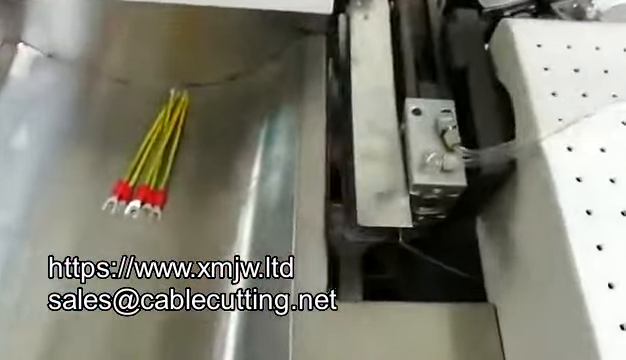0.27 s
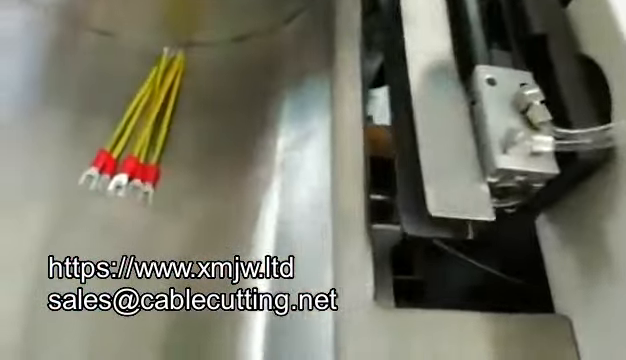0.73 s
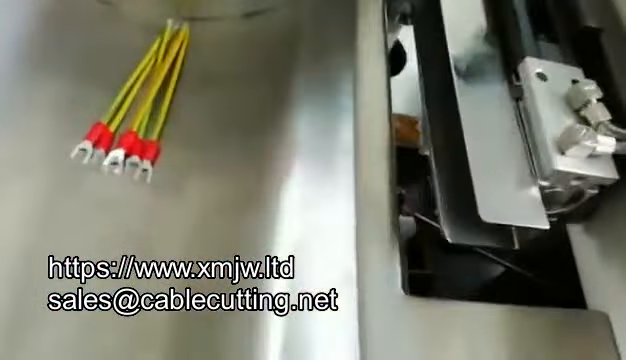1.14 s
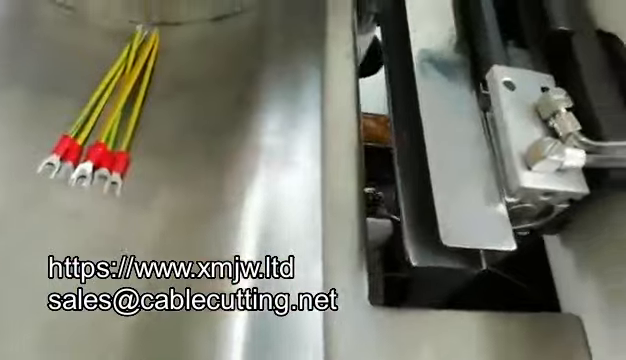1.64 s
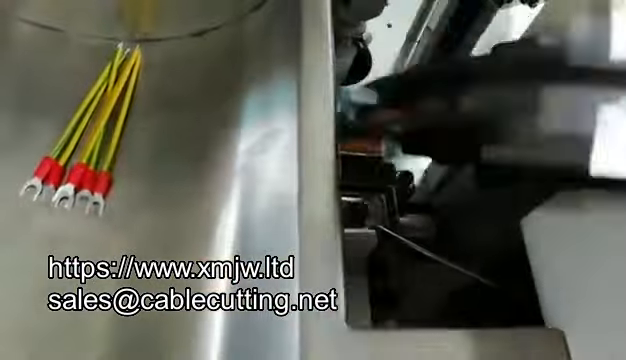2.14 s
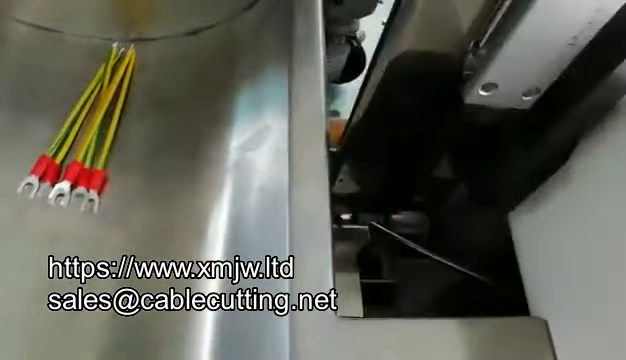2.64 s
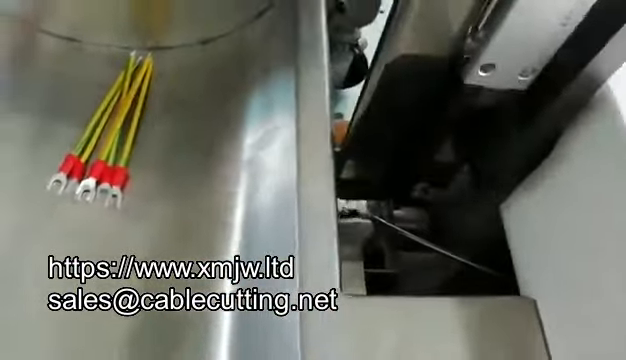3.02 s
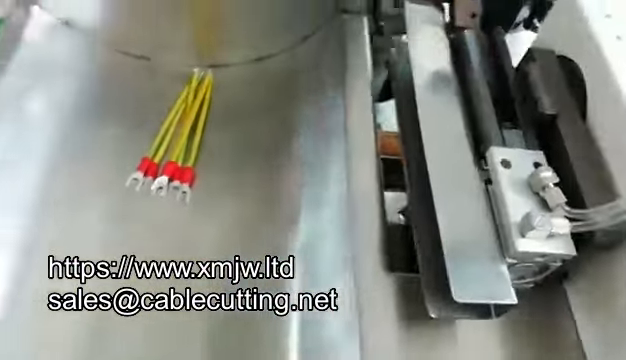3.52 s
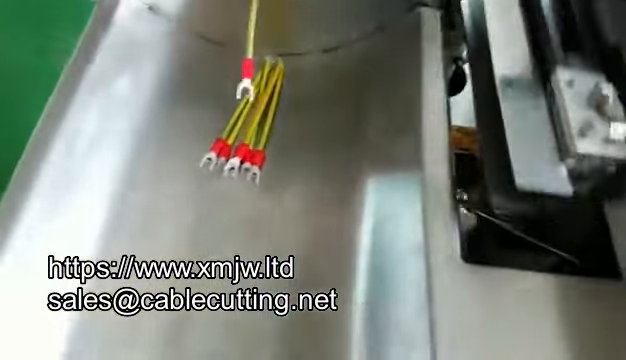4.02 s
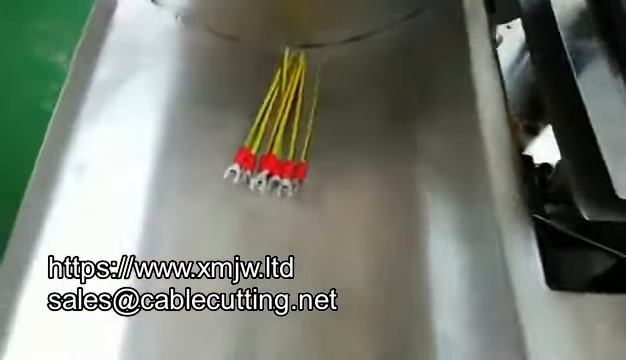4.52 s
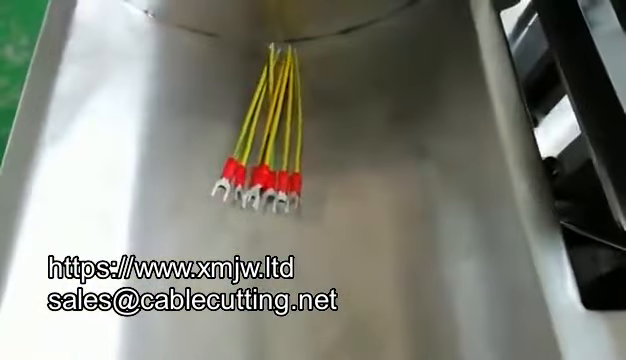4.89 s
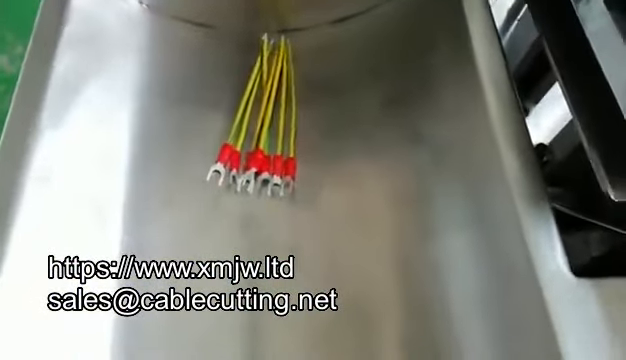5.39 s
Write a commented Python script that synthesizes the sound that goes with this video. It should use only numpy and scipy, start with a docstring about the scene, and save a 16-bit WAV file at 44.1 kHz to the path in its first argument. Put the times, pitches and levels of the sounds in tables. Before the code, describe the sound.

An automatic wire crimping machine works close by, over the faint murmur and hum of a workshop. From the start, geared servos whine up and down and a fine air jet hisses softly. From about 0.5 seconds slides rattle the steel frame, the base booms, valves puff and cylinders thump, followed by sharp knocks from the press and grippers. At 1.2 seconds an air nozzle roars for about half a second. Around 2 seconds a swing arm sings a thin high tone amid more clatter. From 3.1 seconds come quick knocks and a hard hiss of air, which spurts twice near 3.8 seconds as the finished wire crosses the jet. Its small metal terminal ticks brightly on the guide and tray at about 4.2 seconds. At 4.5 seconds the cycle restarts with more whines, rattles and puffs. The panels and room add a short echo.

```python
"""An automatic wire crimping machine, close by, over the murmur of a workshop. From the start geared servos
whine up and down, slides rattle the steel frame and a fine air jet hisses. From 0.5 s the bed booms, valves
puff and cylinders thump; then press, grippers, end stops and gears taking up backlash knock. A blow-off nozzle
roars at 1.2 s, a swing arm sings at 2 s and the jet blows hard from 3.1 s. The finished lead crosses it at 3.8
s, then its terminal ticks on guide and tray. At 4.5 s the cycle restarts. Panels and room echo."""
import sys
import numpy as np
from scipy import signal
from scipy.fft import rfft, irfft, next_fast_len
from scipy.io import wavfile
from scipy.ndimage import uniform_filter1d, map_coordinates

SR = 44100
rng = np.random.default_rng(int(sys.argv[2]) if len(sys.argv) > 2 else 0)


def inscribe(sig):
    """Save sig as 16-bit PCM at rate SR to the path in sys.argv[1].

    A 1-D sig is mono; a 2-D sig holds one channel per row.
    Samples are clipped to [-1, 1] before scaling.
    """
    pcm = np.round(np.clip(np.atleast_2d(sig).T, -1, 1) * 32767)
    wavfile.write(sys.argv[1], SR, pcm.astype(np.int16))


N = 249606
CYCLE_S, BAND_HZ = 4.548, 7530


def amp(db):
    """Decibels to gain."""
    return 10 ** (np.asarray(db) / 20)


def unit(x):
    """Scale to rms 1."""
    return x / np.sqrt(np.mean(x ** 2) + 1e-20)


def along(points, hz):
    """Interpolate (frequency [Hz], value) points on a log axis."""
    f, v = np.transpose(points)
    return np.interp(np.log(hz + 1), np.log(f + 1), v)


def clock():
    """Sample times in s."""
    return np.arange(N) / SR


def since(s):
    """Time since the cycle last passed moment s."""
    return (clock() - s) % CYCLE_S


def held(start, end, attack_s, release_db_per_s):
    """Envelope that rises, holds and dies away, once a cycle."""
    age = since(start)
    return (1 - np.exp(-age / attack_s)) * amp(-release_db_per_s * np.maximum(age - (end - start), 0))


def pulse(s, t60_s, attack_s):
    """Strike envelope, once a cycle."""
    return (1 - np.exp(-since(s) / attack_s)) * amp(-60 * since(s) / t60_s)


def burst(s, t60_s, attack_s):
    """Strike envelope, once only."""
    age = np.maximum(clock() - s, 0)
    return (1 - np.exp(-age / attack_s)) * amp(-60 * age / t60_s)


def wobble(rate_hz):
    """Smooth random curve, rate_hz knots a second."""
    return map_coordinates(rng.standard_normal(int(N * rate_hz / SR) + 4), [clock() * rate_hz])


def filtered(x, response):
    """Apply a frequency response."""
    size = next_fast_len(N + SR // 2)
    return irfft(rfft(x, size) * response(np.fft.rfftfreq(size, 1 / SR)), size)[..., :N]


def resonances(modes):
    """Causal response of (frequency [Hz], width [Hz], gain [dB]) modes, alternating in sign."""
    return lambda f: sum((-1) ** k * amp(db) * 1j * f * width / (hz * hz - f * f + 1j * f * width)
                         for k, (hz, width, db) in enumerate(modes))


def noise(spectrum):
    """Noise of rms 1, coloured by (frequency [Hz], density [dB]) points."""
    return unit(filtered(rng.standard_normal(N), lambda f: amp(along(spectrum, f))))


def resonant_noise(modes):
    """Noise of rms 1, rung through modes."""
    return unit(filtered(rng.standard_normal(N), resonances(modes)))


# diffuse sound: (frequency [Hz], left-right correlation [-1..1])
COHERENCE = [(300, 1), (500, -0.17), (7000, 0.06)]

def spread(pair):
    """Mix two unrelated signals to left and right, alike in the bass."""
    turn = lambda f: np.arccos(np.clip(along(COHERENCE, f), -1, 1)) / 2
    mid, side = filtered(pair, lambda f: np.array([np.cos(turn(f)), np.sin(turn(f))]))
    return np.array([mid + side, mid - side])


# echo decay: (frequency [Hz], t60 [s])
ROOM_DECAY = [(200, 0.12), (1500, 0.26), (7000, 0.058)]

def placed(x, wet_db, left_db):
    """Direct sound plus echo off panels and walls, panned."""
    hz, t, spectra = signal.stft(rng.standard_normal((2, SR // 3)), SR, nperseg=256)
    tail = signal.istft(spectra * amp(-60 * t / along(ROOM_DECAY, hz)[:, None]), SR, nperseg=256)[1]
    echo = spread(signal.fftconvolve(x[None], tail / np.linalg.norm(tail[0]), axes=1)[:, :N])
    return (x + amp(wet_db) * echo) / np.hypot(1, amp(wet_db)) * amp([[left_db / 2], [-left_db / 2]])


def from_right(pair, lag_s=0.00014):
    """Sound from the right arrives later on the left."""
    return filtered(pair, lambda f: np.exp(-2j * np.pi * f * np.array([[lag_s], [0]])))


def shaded(pair, shadow_db):
    """Treble from the right is shadowed on the left."""
    sides = np.array([[-.5], [.5]])
    return filtered(pair, lambda f: amp(shadow_db * np.minimum(f / BAND_HZ, 1) ** 2 * sides))


def turbulence(response, patchy_db, left_db):
    """Diffuse rush of air whose colour flutters in small patches."""
    spectra = signal.stft(rng.standard_normal((2, N)), nperseg=256)[2]
    patches = uniform_filter1d(rng.standard_normal(spectra.shape[1:]), size=3, axis=0)
    patches = uniform_filter1d(patches, size=5, axis=1)
    pair = signal.istft(spectra * amp(patchy_db * unit(patches)), nperseg=256)[1][:, :N]
    return unit(spread(filtered(pair, response))) * amp([[left_db / 2], [-left_db / 2]])


# shop murmur: (frequency [Hz], relative density [dB])
SHOP_SPECTRUM = [(25, -10), (165, -4.5), (234, -4.5), (351, -6), (637, -18), (1050, -28), (1540, -13),
                 (1730, -19), (2420, -19.5), (4940, -24), (7400, -52)]
# shop hum: (frequency [Hz], level [dB])
HUM_TONES = [(176, -48), (349, -54)]

def workshop(floor_db=-43):
    """Other machines murmur and hum all round."""
    hum = sum(amp(db + 3 * wobble(6)) * np.sin(2 * np.pi * hz * clock() + 1.2 * wobble(14))
              for hz, db in HUM_TONES)
    murmur = unit(spread(np.array([noise(SHOP_SPECTRUM), noise(SHOP_SPECTRUM)])))
    return amp(floor_db) * murmur + hum


# servo moves: (start [s], end [s], top mesh pitch [Hz], each ramp [share of move],
# fundamental [dB], octave [dB], frame shake [dB], grinding [dB])
SERVO_MOVES = [(0, .39, 519.2, .06, -49.5, -68, -60, -60), (0.082, 0.306, 1375, .46, -32.5, -34, -52, -49),
               (0.312, .578, 1548, .5, -48, -44, -29, -54), (0.645, 0.871, 1848, .4, -40, -25.5, -26, -30),
               (0.882, 0.984, 1710, .5, -29, -50, -25, -56), (0.984, 1.082, 1770, .5, -30, -52, -25, -44),
               (1.088, 1.215, 1036, 0.5, -32, -52, -27, -56), (1.97, 2.362, 2470, .2, -42, -62, -24, -48),
               (2.372, 2.455, 1280, 0.5, -27, -58, -30, -54), (2.455, 2.57, 1500, 0.5, -34, -62, -33, -46),
               (2.752, 2.85, 1660, 0.49, -24, -58, -26, -46),
               (2.95, 3.085, 1073, 0.37, -37.5, -44, -35, -55),
               (2.987, 3.211, 1555, .5, -48, -43, -28, -36), (3.07, 3.192, 2384, 0.5, -26, -50, -21, -37),
               (4.03, 4.285, 1240, .38, -32, -56, -29, -50), (4.247, 4.37, 1061, .3, -42, -39.5, -38, -66),
               (4.356, 4.444, 1697, .4, -35, -55, -28, -40), (4.373, 4.614, 1571, .5, -29, -38, -29, -32.5)]
# loaded pinion: (order [cycles/turn], relative level [dB])
PINION_TONES = [(4, 0), (5, -6), (8, -7), (11, -7)]
# covers: (frequency [Hz], width [Hz], gain [dB])
COVER_MODES = [(900, 114, 3), (1213, 250, -4.5), (1600, 120, -3.5)]

def servos(teeth=6, runout=0.095, cruise_torque=.35, sing_db=5, bearing_db=-4):
    """Gear whine glides with speed, bearings grind, covers sing as the pitch sweeps their modes."""
    whine, drive, grind = np.zeros((3, N))
    flutter, roughness = 1 + .015 * wobble(500), amp(3.5 * wobble(220))
    first_flicker_db, octave_flicker_db = 3 * wobble(55), 3 * wobble(55)
    for start, end, top_hz, ramp, first_db, octave_db, shake_db, grind_db in SERVO_MOVES:
        speed = axis_speed(start, end, ramp)
        on = speed > 0
        speed = speed[on]
        phase = 2 * np.pi * np.cumsum(top_hz * speed * flutter[on]) / SR
        pressure = 1 + runout * np.sin(phase / teeth)  # teeth bear harder once a turn
        overtones = np.sin(2 * phase) + amp(-19) * np.sin(4 * phase) + amp(-22) * np.sin(5 * phase)
        mesh = amp(first_db + first_flicker_db[on]) * np.sin(phase)
        mesh += amp(octave_db + octave_flicker_db[on]) * pressure * overtones
        pinion = sum(amp(db) * np.sin(order * phase / teeth) for order, db in PINION_TONES)
        crest = .33 * speed ** 2 + .67 * speed ** 14  # peaks at top speed
        whine[on] += crest * mesh + amp(grind_db) * speed ** 2 * pinion
        torque = np.sqrt(speed) * (cruise_torque + (1 - cruise_torque) * np.sqrt(1 - speed ** 2))
        drive[on] += amp(shake_db + sing_db) * torque * (np.sin(phase) + amp(-6) * np.sin(2 * phase))
        grind[on] += amp(grind_db + bearing_db) * pressure * speed ** 2
    covers = filtered(drive * roughness, resonances(COVER_MODES))
    grit = noise([(500, 5.5), (1300, 10), (2700, -4), (3600, -2), (4500, -7), (7000, 2)])
    bearings = grind * roughness * grit
    motors = placed(whine * roughness, wet_db=4.5, left_db=0)
    return motors + placed(covers + bearings, wet_db=5.5, left_db=4.5)


def axis_speed(start, end, ramp):
    """Speed 0-1: ramp up, cruise, ramp down."""
    edge = np.minimum(since(start), end - start - since(start)) / (end - start)
    return np.sin(np.pi / 2 * np.clip(edge / ramp, 0, 1))


def servo_shake(peak_hz=920, width_hz=199, off_peak=0.35, settle_s=0.047):
    """The frame shakes most as a mesh pitch passes its modes; loose parts then settle."""
    force = np.zeros(N)
    for start, end, top_hz, ramp, _, _, shake_db, _ in SERVO_MOVES:
        speed = axis_speed(start, end, ramp)
        on = speed > 0
        resonance = np.exp(-((top_hz * speed[on] - peak_hz) / width_hz) ** 2)
        force[on] += amp(shake_db) * (off_peak * speed[on] + resonance)
    pole = np.exp(-1 / (settle_s * SR))
    return signal.lfilter([1 - pole], [1, -pole], force)


# steel frame: (frequency [Hz], width [Hz], gain [dB])
FRAME_MODES = [(819.3, 10, 13.5), (913, 23, -0.5), (1041.3, 39, 1), (1177, 37, 5), (1275, 57, -6.5),
               (1525, 140, -9.5), (1654, 25, -4)]

def frame_ring(x, drift=.06):
    """Ring x through the frame, rms 1; the modes drift at random, as under moving carriages."""
    position = np.cumsum(1 + drift * wobble(22))
    return unit(np.interp(position % N, np.arange(N), filtered(x, resonances(FRAME_MODES))))


# carriage strokes: (start [s], end [s], rattle [dB], rumble [dB])
CARRIAGE_STROKES = [(0.57, 0.748, -31.5, -44), (0.718, 1.022, -33, -36.5), (1.1, 2.08, -30.5, -34.5),
                    (1.743, 2.477, -27, -34.5), (2.083, 2.346, -44, -30.5), (2.72, 2.926, -41.5, -42.5),
                    (3.108, 3.191, -32, -37), (3.213, 3.702, -38.5, -42), (3.687, 3.997, -29, -32.5),
                    (4.043, 4.177, -32.5, -31)]
# rolling balls and base rumble: (frequency [Hz], relative density [dB])
ROLL_SPECTRUM = [(400, -73), (750, 7), (1200, 5.5), (1700, 3.5), (2100, -2), (3000, -3), (7500, -9.5)]
RUMBLE_SPECTRUM = [(40, -30), (110, -19.5), (190, -1.5), (250, -8.5), (310, 4), (400, -5.5), (480, -1),
                   (620, -8), (1500, -21), (4000, -41)]

def carriages(rise_s=0.01, stop_db_per_s=122.5, lumpy_db=3):
    """Ball slides rattle the frame, rush and rumble on each stroke and servo move."""
    slide_power, load_power = np.zeros((2, N))
    for start, end, rattle_db, rumble_db in CARRIAGE_STROKES:
        run = held(start, end, rise_s, stop_db_per_s)
        slide_power += (run * amp(rattle_db)) ** 2
        load_power += (run * amp(rumble_db)) ** 2
    slide, load, shake = np.sqrt(slide_power), np.sqrt(load_power), servo_shake()
    chatter = rng.standard_normal(N) * amp(lumpy_db * wobble(140))
    rattle = np.hypot(amp(-5) * slide, amp(-12) * shake) * frame_ring(chatter)
    rolling = unit(noise(ROLL_SPECTRUM) * amp(lumpy_db * wobble(110)))
    rolling *= np.hypot(amp(-6) * slide, amp(-16) * shake)
    rumble = unit(noise(RUMBLE_SPECTRUM) * amp(3.4 * wobble(40)))
    rumble *= np.hypot(amp(-1) * load, amp(-13) * shake)
    clatter = placed(rattle + rolling, wet_db=-2.5, left_db=3.5)
    return clatter + from_right(placed(rumble, wet_db=5, left_db=-0.5))


# jet valve: (open [s], close [s], level [dB], pressure sag [dB/s])
JET_OPENINGS = [(0.36, 1.2, -36, 2.5), (1.218, 1.666, -18, -5.5), (3.144, 3.867, -12, 6.5),
                (4.337, 4.912, -41.5, -0.5)]
# lead crossing the jet: (time [s], level [dB], t60 [s])
LEAD_SPURTS = [(3.796, -8.5, 0.096), (3.881, -7.5, 0.15)]

def air_flow(rise_s=0.037, bleed_db_per_s=45.5, after_puff_db=-15, leak_db=-43.5):
    """Jet flow sags or grows while open and bleeds off after each closing or puff; fittings leak."""
    jets = [amp(db - sag * np.minimum(since(start), end - start))
            * held(start, end, rise_s, bleed_db_per_s) for start, end, db, sag in JET_OPENINGS]
    bleeds = [amp(db + after_puff_db) * held(s, s + swell_s, swell_s, bleed_db_per_s)
              for s, db, swell_s in VALVE_PUFFS]
    spurts = [amp(db) * pulse(s, t60_s, attack_s=0.0025) for s, db, t60_s in LEAD_SPURTS]
    return np.sqrt(sum(flow ** 2 for flow in jets + bleeds + spurts) + amp(leak_db) ** 2)


# jet hiss: (frequency [Hz], relative density [dB])
HISS_SPECTRUM = [(150, -36), (700, -20.5), (1400, 0), (2100, 0.5), (3400, 3.5), (5000, 5), (6300, 7.5),
                 (7000, 13), (7460, 12.5)]
# jet on an edge: (frequency [Hz], width [Hz], gain [dB])
EDGE_MODES = [(1810, 160, 0), (3420, 120, -6), (5499, 30, 6)]

def fine_jet(hiss_db=2, edge_start_s=3.35, edge_end_s=3.52, edge_db=-34):
    """A fine jet hisses with the flow and briefly turns hollow on meeting an edge."""
    hollow = amp(edge_db) * held(edge_start_s, edge_end_s, .03, 120) * resonant_noise(EDGE_MODES)
    hiss = turbulence(lambda f: amp(along(HISS_SPECTRUM, f)), patchy_db=2.5, left_db=-2)
    return shaded(amp(hiss_db) * air_flow() * hiss + hollow, shadow_db=7)


# heavy travel: (start [s], end [s], level [dB])
BED_BOOMS = [(0.527, 1.2, -41), (0.965, 1.02, -34), (1.7, 2.56, -39.5), (2.79, 2.927, -35),
             (4.065, 4.17, -38)]
# machine bed: (frequency [Hz], width [Hz], gain [dB])
BED_MODE = [(192.7, 55, 0)]

def bed(rise_s=0.014, stop_db_per_s=130):
    """The bed booms at its lowest mode while heavy axes travel."""
    power = sum((amp(db) * held(start, end, rise_s, stop_db_per_s)) ** 2 for start, end, db in BED_BOOMS)
    boom = unit(filtered(rng.standard_normal(N), lambda f: resonances(BED_MODE)(f) ** 2))
    return np.sqrt(power) * boom


# valve exhausts: (time [s], level [dB], time to peak [s])
VALVE_PUFFS = [(0.551, -24.5, 0.04), (1.214, -26.5, 0.028), (2.367, -30, 0.033), (3.163, -29.5, 0.038),
               (4.05, -31, 0.028)]

def valves(grain_db=3, port_db=-5):
    """Each valve dumps a cylinder's air in a short puff that sounds its port."""
    flow = sum(amp(db) * (since(s) / swell_s * np.exp(1 - since(s) / swell_s)) ** 4
               for s, db, swell_s in VALVE_PUFFS)
    air = noise([(400, -17.5), (1400, -1), (3000, 5), (5000, 6.5), (7000, 0.5)])
    port = resonant_noise([(2350, 90, 0), (6900, 250, -2)])
    puffs = flow * amp(grain_db * wobble(230)) * (air + amp(port_db) * port)
    return shaded(placed(puffs, wet_db=0.5, left_db=1), shadow_db=17.5)


# cushioned stops: (time [s], level [dB])
CYLINDER_STOPS = [(0.572, -39.5), (1.65, -36.5), (3.162, -42), (3.608, -34.5), (4.071, -34)]

def cylinders():
    """Pistons run into their cushions and thump the base."""
    push = sum(amp(db) * pulse(s, t60_s=1, attack_s=0.0032) for s, db in CYLINDER_STOPS)
    return push * noise([(30, -30), (75, -6), (130, -11.5), (220, -8.5), (500, -58.5)])


# blows: (time [s], level [dB], thud offset [dB], clack offset [dB])
BLOWS = [(0.78, -20, 7, -19.5), (0.831, -15, -4.5, -9.5), (1, -27.5, 1, -24.5), (1.245, -17.5, 5.5, 7),
         (2.164, -12.5, -2.5, -38), (2.411, -19.5, 5.5, -21), (3.053, -18, -30.5, -8.5),
         (3.197, -34.5, -14, 14), (3.215, -11.5, -14, 7), (4.067, -23.5, 0, -16), (4.1, -26, 7.5, -10),
         (4.159, -27.5, 3, -10), (4.49, -20, -28.5, -22)]

def knocks(ring_db=-6, thud_db=-11, clack_db=-7):
    """Press, grippers, end stops and gears taking up backlash as servo moves start ring the frame, thud in the
    base and clack steel on steel."""
    ring, thud, clack = np.zeros((3, N))
    for s, db, low_db, high_db in BLOWS:
        ring += amp(db + ring_db) * pulse(s, t60_s=0.068, attack_s=0.00037)
        thud += amp(db + low_db + thud_db) * pulse(s, t60_s=0.12, attack_s=0.00058)
        clack += amp(db + high_db + clack_db) * pulse(s, t60_s=0.088, attack_s=0.00045)
    frame = frame_ring(rng.standard_normal(N))
    steel = noise([(800, -22), (1500, -3.5), (3000, -9.5), (4200, -7.5), (7000, -13)])
    return placed(ring * frame + thud * noise(RUMBLE_SPECTRUM) + clack * steel, wet_db=-7, left_db=1.5)


# gap at the nozzle: (frequency [Hz], width [Hz], gain [dB])
GAP_MODES = [(1213, 190, -6.5), (1610, 330, -1.5), (1830, 88, 2.5), (2101, 21, -0.5), (2635, 230, -4),
             (3254, 43, 1), (3480, 39, -0.5), (3880, 210, 1), (4990, 450, -3), (5070, 180, -4),
             (5520, 290, -7.5), (7170, 99, 2.5), (7450, 26, 2)]

def blow_off(open_s=1.238, close_s=1.656, level_db=-17, sputter_db=1):
    """A fast-switching nozzle roars into a resonant gap."""
    gate = held(open_s, close_s, attack_s=0.0021, release_db_per_s=256)
    flow = amp(level_db + sputter_db * wobble(90)) * gate
    return flow * turbulence(resonances(GAP_MODES), patchy_db=2, left_db=-0.5)


# swing arm: (frequency [Hz], width [Hz], gain [dB])
ARM_MODES = [(187, 130, -1.5), (306, 10, 4), (338, 24, 3), (450, 35, -7), (556, 32, -15.5),
             (782, 22, -13.5)]

def swing_arm(start_s=2.04, end_s=2.285, pitch_hz=2480, peak_db=-31.5, octave_db=-43, drone_db=-28.5):
    """At full speed the drive sings a thin, swelling tone with its octave; the arm drones, rings out."""
    phase = 2 * np.pi * np.cumsum(pitch_hz * (1 + 0.0008 * wobble(47))) / SR
    swell_db = peak_db - 48 * np.maximum(end_s - clock(), 0)  # 48 dB/s
    tone = amp(swell_db + 2 * wobble(25.73)) * np.sin(phase)
    octave = amp(octave_db + 3.6 * wobble(25)) * np.sin(2 * phase)
    running = held(start_s, end_s, attack_s=0.015, release_db_per_s=402)
    whine = placed(running * (tone + octave), wet_db=-8, left_db=-1.5)
    drone = held(start_s, end_s, attack_s=0.094, release_db_per_s=78) * resonant_noise(ARM_MODES)
    return whine + placed(amp(drone_db) * drone, wet_db=-6, left_db=1.5)


# hits on guide and tray: (time [s], level [dB], ring [Hz], t60 [s])
TERMINAL_HITS = [(4.133, -25, 7900, .05), (4.2487, -2, 7900, .011)]

def terminal(crack_db=-13):
    """The small fork terminal hits sheet steel: a bright crack and a very short ring."""
    crack = amp(crack_db) * noise([(1500, -40), (5000, -2), (7500, 3)])
    ticks = np.zeros(N)
    for s, db, hz, t60_s in TERMINAL_HITS:
        ring = np.sin(2 * np.pi * hz * (clock() - s))
        ticks += amp(db) * burst(s, t60_s, attack_s=.001) * (ring + crack)
    return placed(ticks, wet_db=-9, left_db=-6)


def scene():
    """Machine and shop, cut above BAND_HZ, plus the brighter terminal ticks."""
    machine = servos() + swing_arm() + carriages() + fine_jet() + blow_off() + valves() + knocks()
    lows = from_right(cylinders() + bed() + workshop())
    return filtered(machine + lows, lambda f: amp(-np.clip(f - BAND_HZ, 0, 400) / 4)) + terminal()


def record(dry):
    """Steep low-pass at 8600 Hz."""
    return filtered(dry, lambda f: 1 / np.sqrt(1 + (f / 8600) ** 40))


dry = scene()
out = record(dry)
inscribe(out)
```